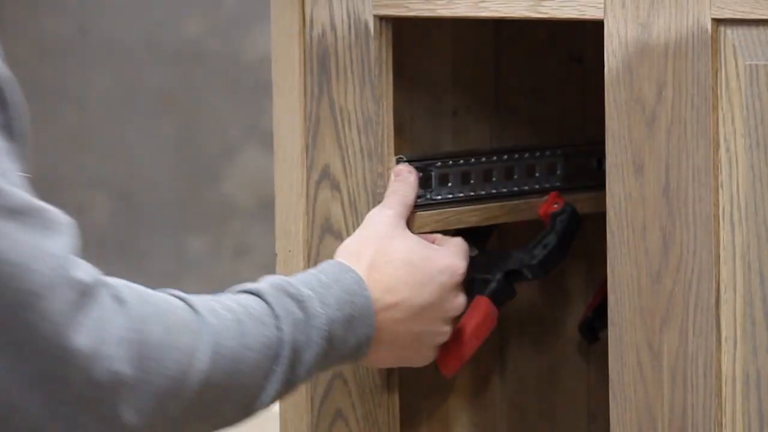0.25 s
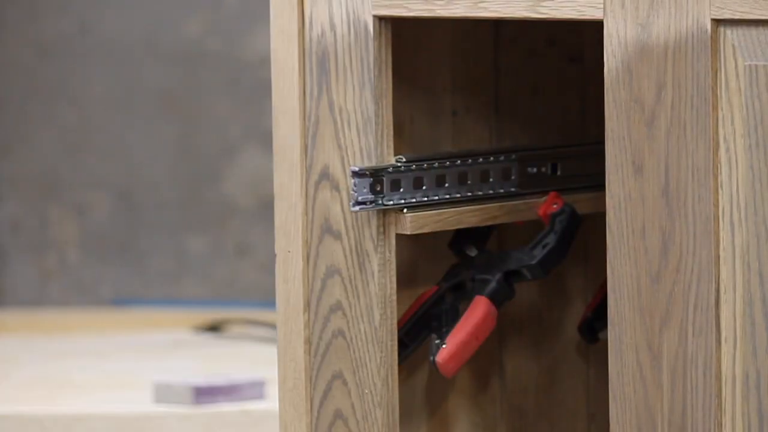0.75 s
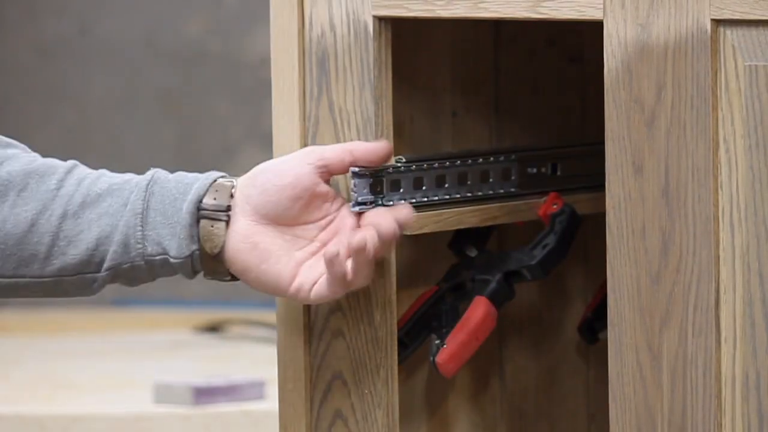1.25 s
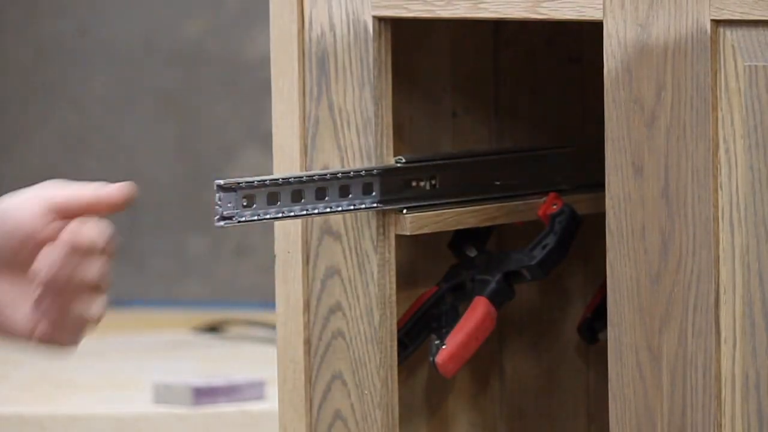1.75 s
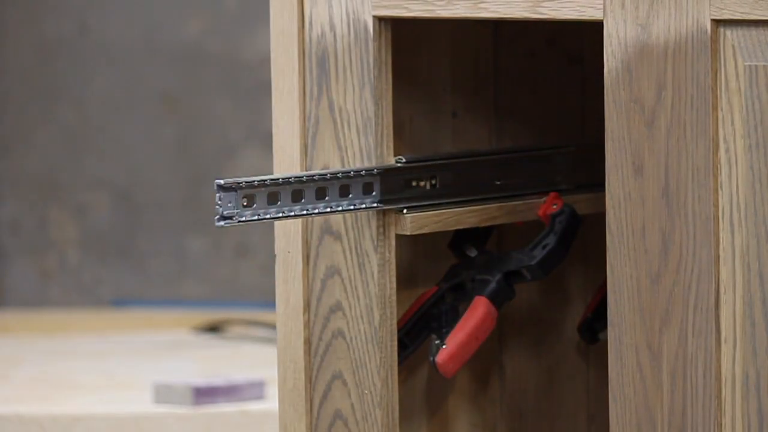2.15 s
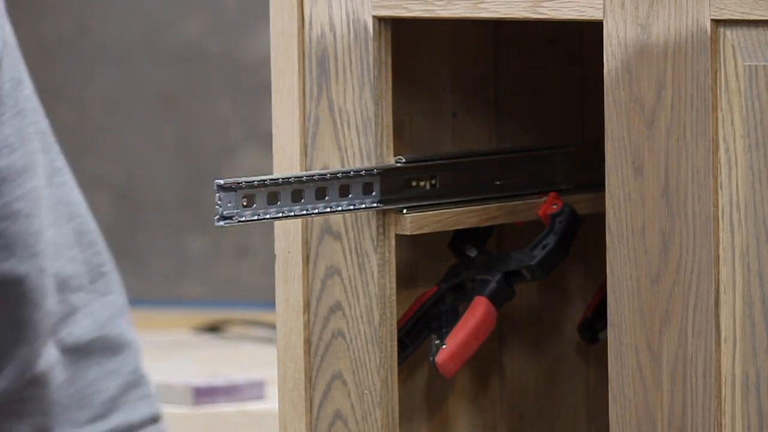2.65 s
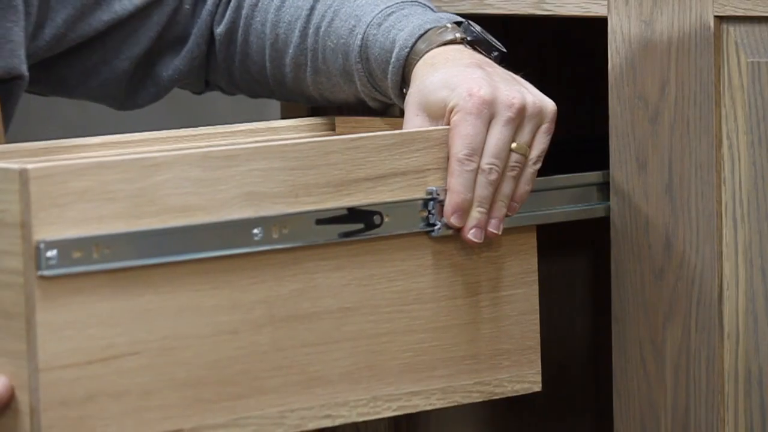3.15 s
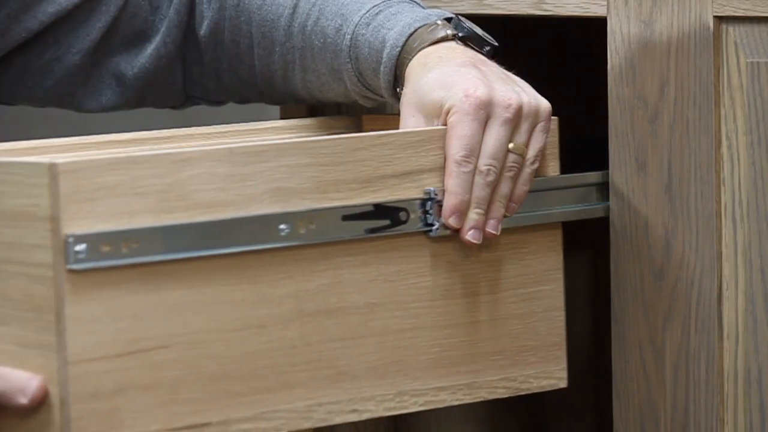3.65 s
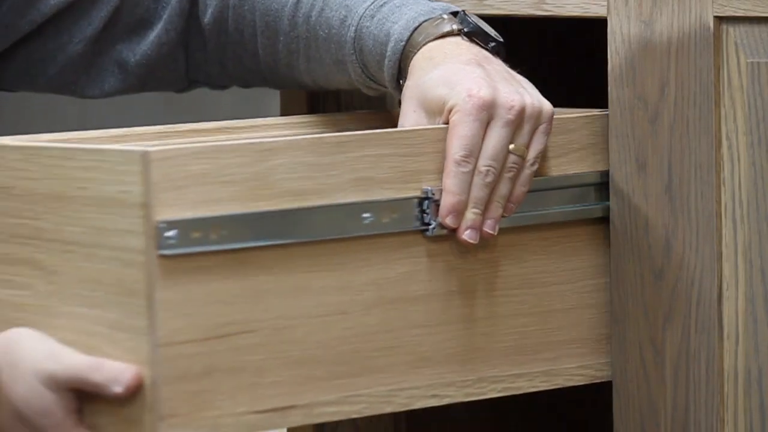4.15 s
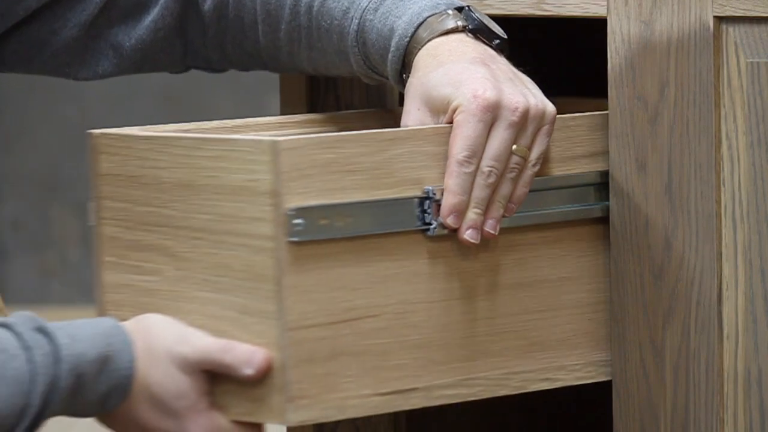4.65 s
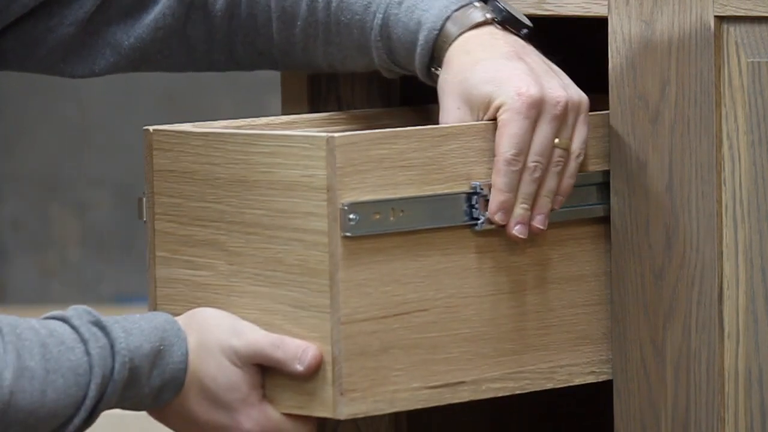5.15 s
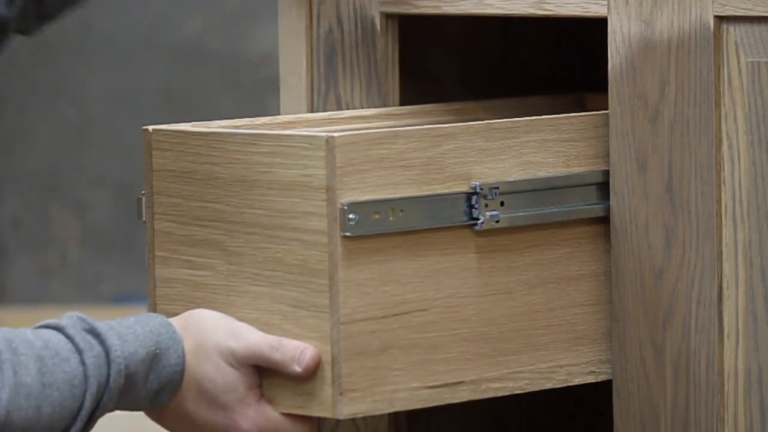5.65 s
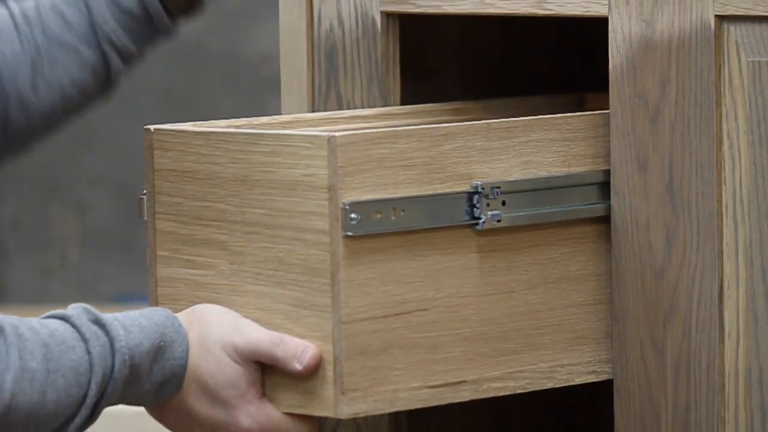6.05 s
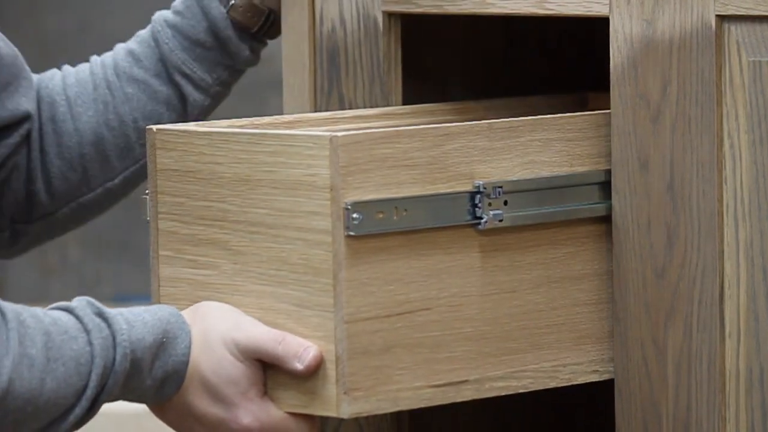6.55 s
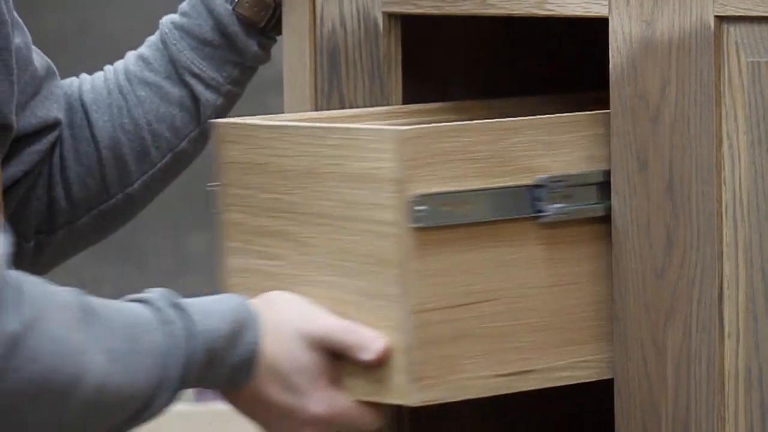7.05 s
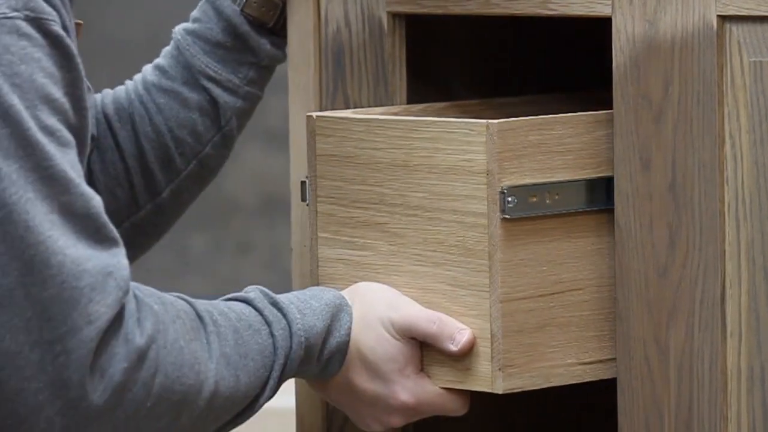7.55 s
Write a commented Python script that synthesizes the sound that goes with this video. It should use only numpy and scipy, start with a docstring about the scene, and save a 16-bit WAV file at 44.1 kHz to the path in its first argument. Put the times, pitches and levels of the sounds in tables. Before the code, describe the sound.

In a lively workshop, a steel runner is thumped home in a wooden cabinet, springs back with a click and short slide, then is pulled out to a loud clack. A wooden drawer rattles onto the rails, latches sharply, catches, jolts and breaks free with a hollow bang before rolling to a thud. Sleeves rustle over a steady fan whir. Close microphone, with room echo.

```python
"""A bare steel ball-bearing runner is pushed home and pulled out of an oak cabinet in a workshop.
A wooden drawer is then fed onto the runners: it knocks, latches, jolts and rolls in.
Knocks are short clatters plus ringing modes; rolling is made of countless tiny random contacts.
Sleeves (coloured grains) brush in between, over the steady whir of a fan (coloured noise) and a
thin whine (a sine). A decaying noise tail is the room; both channels carry the same sound."""
import sys
import numpy as np
from scipy import signal
from scipy.fft import rfft, irfft
from scipy.io import wavfile
from scipy.ndimage import uniform_filter1d

SR = 44100
rng = np.random.default_rng(int(sys.argv[2]) if len(sys.argv) > 2 else 0)


def wav_record(signal):
    """Record a signal, one row per channel, as 16-bit PCM in the file named by sys.argv[1]."""
    frames = np.transpose(np.atleast_2d(signal))
    bounded = np.clip(frames, -1, 1)
    # unit amplitude maps onto the largest positive 16-bit level
    quanta = np.round(bounded * 32767).astype(np.int16)
    wavfile.write(sys.argv[1], SR, quanta)


N = 343980
TIME = np.arange(N) / SR


def from_db(db):
    """Decibels to gain."""
    return np.exp(np.asarray(db) * np.log(10) / 20)


def rms_one(x):
    """Scale to rms 1."""
    return x / np.sqrt(np.mean(x ** 2) + 1e-20)


def unit_energy(x):
    """Scale to a sum of squares of 1."""
    return x / np.sqrt(np.sum(x ** 2) + 1e-20)


def at_hz(points, hz):
    """Read a table of (Hz, value) on a log-frequency axis."""
    freqs, values = np.transpose(points)
    return np.interp(np.log(hz + 1e-3), np.log(freqs), values)


def response(spectrum, size=4096):
    """Impulse response with this spectrum, its energy as early as possible (minimum phase); unit energy."""
    hz = np.arange(size // 2 + 1) * SR / size + 1
    octaves_outside = np.abs(np.log2(hz / np.clip(hz, spectrum[0][0], spectrum[-1][0])))
    # beyond the ends of the table the level falls 20 dB per octave
    level_db = at_hz(spectrum, hz) - 20 * octaves_outside
    cepstrum = irfft(np.log(from_db(level_db)))
    # folding the cepstrum onto positive times makes the response causal
    cepstrum[1:size // 2] *= 2
    cepstrum[size // 2 + 1:] = 0
    return unit_energy(irfft(np.exp(rfft(cepstrum))))


def colour(x, spectrum):
    """Give a white excitation this spectrum; it keeps its power."""
    return signal.oaconvolve(x, response(spectrum))[:len(x)]


def resonate(x, hz, width_hz):
    """Two-pole resonance: a wider one dies away faster."""
    r = np.exp(-np.pi * width_hz / SR)
    feedback = [1, -2 * r * np.cos(2 * np.pi * hz / SR), r * r]
    return signal.lfilter([1, 0, -1], feedback, x + 1e-18)


def dying(t, t60):
    """Falls 60 dB in t60 seconds."""
    return np.exp(-np.log(1000) * t / max(t60, 1e-3))


def add(track, s, sound):
    """Mix a sound in at time s."""
    start = round(s * SR)
    track[start:start + len(sound)] += sound[:N - start]


def grains(per_s, spread_db, size):
    """Random tiny contacts of uneven strength; rms 1."""
    unevenness = from_db(spread_db * np.minimum(rng.exponential(1, size), 4))
    strength = unevenness * rng.standard_normal(size)
    happens = rng.random(size) < per_s / SR
    return rms_one(strength * happens)


def swells(rows):
    """Gain that grows and fades in bells; each length is taken between the half-power points."""
    power = sum(from_db(db) ** 2 * .5 ** ((2 * (TIME - s) / length) ** 2) for s, length, db in rows)
    return np.sqrt(power)


# Colour of the fan's air noise. Each row: frequency in Hz, relative level in dB per Hz.
FAN = [(15, -11), (25, -7.5), (130, 3.5), (161, -1), (229, 3.5), (416, 3.5), (476, 1), (531, 1), (863, -21),
       (1480, 0.5), (2110, -15.5), (3430, -32), (3720, -16), (14800, -30), (16000, -38)]
# Resonances of the fan housing. Each row: frequency in Hz, width in Hz, level in dB.
FAN_PEAKS = [(358, 34, -67), (523, 33, -63), (708, 220, -62.5), (1245, 69, -62.5), (1660, 310, -69.5),
             (3410, 104, -66.5)]
AIR_DB = -57.5
WHINE_HZ, WHINE_DB = 15725, -72   # thin whine of some electronics


def background():
    """Fan air is coloured noise, its housing is resonating noise, and electronics whine as a faint sine."""
    air = from_db(AIR_DB) * colour(rng.standard_normal(N), FAN)
    housing = 0
    for hz, width_hz, db in FAN_PEAKS:
        housing = housing + from_db(db) * rms_one(resonate(rng.standard_normal(N), hz, width_hz))
    whine = from_db(WHINE_DB) * np.sqrt(2) * np.sin(2 * np.pi * WHINE_HZ * TIME)
    return air + housing + whine


# Arm movements brush the sleeves. Each row: middle in seconds, length in seconds, level in dB.
SLEEVE = [(.3, 0.39, -53), (.68, 0.21, -54), (1.2, 0.45, -52), (1.72, 0.22, -47), (2.23, 0.26, -49.5),
          (2.37, 0.19, -46.5), (2.72, 0.17, -52), (3.65, 0.84, -56), (4.58, 0.28, -55), (6.13, 0.23, -58),
          (6.5, 0.34, -63.5)]
# Colour of the cloth. Each row: frequency in Hz, relative level in dB per Hz.
CLOTH = [(300, -6.5), (900, 1), (1400, 5), (2300, 0.5), (3500, 1), (6500, -5), (12000, -6.5),
         (16000, -10.5)]
SLEEVE_REST_DB = -64   # rustle between the movements


def sleeves():
    """Fibres of a sweatshirt brush past each other in dense tiny contacts."""
    movement = np.hypot(swells(SLEEVE), from_db(SLEEVE_REST_DB))
    return movement * colour(grains(per_s=20000, spread_db=-2.0, size=N), CLOTH)


def clatter(t60, rise_s=0.0008):
    """Loose parts chatter for a moment after a blow; unit energy."""
    t = TIME[:SR // 4]
    chatter = grains(per_s=16000, spread_db=0.5, size=len(t))
    return unit_energy(chatter * dying(t, t60) * (1 - np.exp(-t / rise_s)))


def mode_tones(t, modes, rise_s=0.0056):
    """Each mode builds up and rings on, with alternating signs; modes x time."""
    tones = []
    for k, (hz, db, t60) in enumerate(modes):
        tones.append((-1) ** k * from_db(db) * np.sin(2 * np.pi * hz * t) * dying(t, t60))
    return np.array(tones) * (1 - np.exp(-t / rise_s))


def ringing(tones, weights_db=0, scatter_db=3.0):
    """The modes sound together, in a slightly different mix for each blow; unit energy."""
    mix_db = weights_db + scatter_db * rng.standard_normal(len(tones))
    return unit_energy(from_db(mix_db) @ tones)


def blow_gains(level_db, after_db):
    """Share a blow's energy, given as rms over 0.1 s, between its first clatter and its after-ring."""
    first = from_db(level_db) * np.sqrt(SR / 10 / (1 + from_db(after_db) ** 2))
    return first, first * from_db(after_db)


# Knocks of runner and drawer: the bare runner is pushed home (0.045 s), springs out (0.392) and
# hits its end stop (1.562). The drawer meets the runners (2.986), the latch snaps (4.084), the inner
# rails catch (5.1), the drawer jolts (5.904), breaks free (6.967) and comes to rest (7.488).
# Each row: start in seconds, basic 60 dB decay of the clatter in seconds, after-ring against clatter
# in dB, then levels in dB (rms over 0.1 s, before each part's trims) of cabinet, drawer and rail,
# hardness in dB (ball cage above rail), pitch of the struck spot in Hz, level of that spot in dB.
BLOWS = [ (0.045, 0.21, 6, -50, -47.5, -48, -1.5, 3050, -46.5),
         (0.062, 0.13, 1.5, -37, -41.5, -53, -10, 170, -39.5),
         (0.078, 0.2, 1.5, -43, -51, -46.5, -17, 1790, -41),
         (0.392, 0.038, 4, -74, -65, -45, 1.5, 4430, -45), (1.036, 0.13, -3, -68, -59, -47, -6, 3030, -51),
         (1.050, .05, -2, -58, -52.5, -48, -8, 2040, -46.5),
         (1.562, .04, 3.5, -40, -40.5, -49.5, 10, 4280, -44),
         (1.578, 0.16, 1, -35, -49, -46, -1, 156, -35.5),
         (1.600, 0.06, -2, -34.5, -59, -41, -3, 5320, -42.5),
         (2.714, 0.025, -12, -56, -55, -68.5, 15.5, 430, -51.5),
         (2.986, 0.055, 7, -51.5, -39.5, -36.5, -6, 953, -35.5),
         (3.017, 0.18, -4, -61, -40, -41.5, 5.5, 1210, -36.5),
         (3.024, 0.14, -2, -58, -55, -51, 5, 2340, -39),
         (3.047, 0.15, -2.5, -43.5, -40.5, -46, 1, 414, -35), (3.055, .05, 16, -52, -44.5, -62, 0, 85, -46),
         (4.036, 0.2, 0, -64, -48, -47.5, -15, 1120, -47),
         (4.058, .07, -11.5, -44.5, -54, -51, -1, 430, -47.5),
         (4.0839, 0.014, -5.5, -70, -54.5, -44, 10.5, 5660, -33.5),
         (4.093, 0.0067, -1, -77, -73, -48.5, 11, 5040, -45.5),
         (4.676, 0.037, 2.5, -44.5, -53, -49.5, -7, 1730, -47.5),
         (4.738, 0.21, -4.5, -43, -51, -45.5, -8, 3450, -39.5),
         (4.748, 0.12, 1, -58, -52, -48.5, -18, 2620, -39.5),
         (4.756, 0.085, 3, -42.5, -61, -60, -16, 189, -38.5),
         (5.056, 0.093, 9, -54, -46, -51, 2.5, 6900, -56),
         (5.100, 0.055, .5, -56, -36, -36, 1, 4380, -34.5),
         (5.103, 0.11, 16, -57, -42, -40.5, -15, 3240, -38),
         (5.106, 0.041, -2, -62, -46, -53, 2, 5260, -39.5),
         (5.904, 0.064, 0.5, -39.5, -40.5, -49, -16, 778, -39),
         (5.909, .09, 1, -41, -38, -44, -24, 1275, -34.5),
         (5.920, 0.21, 1, -39, -36.5, -48.5, -16, 91, -42.5),
         (6.492, 0.065, -0.5, -64, -52, -67, -13, 424, -58),
         (6.967, 0.13, -6.5, -62, -34, -34.5, -9, 2890, -39),
         (6.973, 0.049, 4, -40.5, -29, -35.5, -2, 840, -37.5),
         (7.488, 0.048, 5, -42, -42, -58, -9, 92, -39.5), (7.514, 0.17, 1, -43, -58, -77, 0, 138.5, -35)]
PANEL_DB = -2   # the thin panels shake this far from the mean level of drawer and rail


def part_levels():
    """What every blow gives to cabinet, drawer, panels, rail and ball cage, in dB; parts x blows."""
    cabinet, drawer, rail, hardness = np.transpose(BLOWS)[3:7]
    panels = (drawer + rail) / 2 + PANEL_DB
    return np.array([cabinet, drawer, panels, rail, rail + hardness])


def struck_part(levels_db, spectrum, modes, modes_db, room_db, slowness):
    """One part under all blows, its clatter stretched by slowness: (direct sound, sound sent to the room)."""
    t, body = TIME[:SR * 4 // 5], response(spectrum)
    near, far, tones = np.zeros((3, N))
    bank = mode_tones(t, modes)
    for (s, t60, after_db, *_), level_db in zip(BLOWS, levels_db):
        first, after = blow_gains(level_db, after_db)
        burst = unit_energy(signal.fftconvolve(clatter(t60 * slowness), body))
        add(near, s, first * burst)
        add(far, s, after * burst)
        add(tones, s, after * ringing(bank))
    return np.array([near + from_db(modes_db) * tones, from_db(room_db) * far])


def struck_spots(modes_db=-10.5, room_db=-0.5, width_share=0.085, falloff_db=55.0):
    """The spot that is hit adds its own resonance and wakes the modes near its pitch: (direct, room send)."""
    t = TIME[:SR * 4 // 5]
    modes = np.array(CABINET_MODES + DRAWER_MODES + PANEL_MODES + RAIL_MODES + CAGE_MODES)
    near, far = np.zeros((2, N))
    bank = mode_tones(t, modes)
    for s, t60, after_db, *_, hz, level_db in BLOWS:
        first, after = blow_gains(level_db, after_db)
        burst = unit_energy(resonate(clatter(t60), hz, width_share * hz))
        octaves_off = np.abs(np.log2(modes[:, 0] / hz))
        add(near, s, first * burst)
        add(near, s, after * from_db(modes_db) * ringing(bank, -falloff_db * octaves_off ** 2))
        add(far, s, after * from_db(room_db) * burst)
    return np.array([near, far])


# Strong modes of carcass, drawer box, thin panels, steel rail and ball cage.
# Each row: frequency in Hz, relative level in dB, 60 dB decay in seconds.
CABINET_MODES = [(63, -19, .9), (91, -15, .6), (112, -12, .5), (127, -4, .5), (140, -5, .5), (153, -4, .85),
                 (194, 0, .55), (205, -9, .6)]
DRAWER_MODES = [(243, -4, .5), (275, 0, .6), (294, -7, .6), (338, -8, .5), (384, -7, .5), (406, -2, .7),
                (448, -6, .5), (484, -7, .45), (535, -9, .45)]
PANEL_MODES = [(731, -6, .4), (868, 0, .4), (955, -6, .35), (1216, -1, .4), (1332, -5, .35),
               (1398, -3, .35), (1813, -4, .48)]
RAIL_MODES = [(2337, -3, .6), (2686, -3, .45), (2867, -4, .4), (3299, 0, .45), (3429, -2, .45),
              (4214, -2, .45), (4366, -2, .53), (5184, -6, .38), (5351, -3, .41)]
CAGE_MODES = [(8000, 13, .29), (8500, 11, 0.54), (9679, -11, .33), (9900, 5, .35), (11700, 3, .29)]
# The dense, quickly damped modes between them, as the colour of each part's clatter.
# Each row: frequency in Hz, relative level in dB per Hz.
CABINET = [(25, -42), (45, -19), (62, -2), (80, -10), (100, -9.5), (130, 0), (200, 10), (250, -16.5),
           (450, -36.5)]
DRAWER = [(100, -38.5), (190, -28), (260, 11.5), (420, 2.5), (540, -2.5), (800, -6), (1500, -71)]
PANEL = [(300, 7.5), (500, -11), (700, -8), (900, 2.5), (1250, 0), (1800, 1.5), (2300, -11.5), (4000, -10)]
RAIL = [(1200, -24), (2050, -7), (2340, 0), (2500, -5), (2800, 0), (3030, -4), (3350, 1), (3850, -9),
        (4300, -1), (4750, -10), (5350, -5), (6100, -14), (7000, -13), (10000, -34)]
CAGE = [(2500, 4), (5000, -5), (6500, -2), (8200, 0), (10800, -1.5), (12800, 1.5), (15000, -1.5),
        (16500, -18)]


def blows():
    """Every knock shakes carcass, drawer box, thin panels, steel rail and ball cage: (direct, room send)."""
    cabinet, drawer, panel, rail, cage = part_levels()
    return (struck_part(cabinet, CABINET, CABINET_MODES, modes_db=-1.0, room_db=1.5, slowness=1.5)
            + struck_part(drawer, DRAWER, DRAWER_MODES, modes_db=-4.5, room_db=0.5, slowness=1.08)
            + struck_part(panel, PANEL, PANEL_MODES, modes_db=-10.0, room_db=2.5, slowness=0.98)
            + struck_part(rail, RAIL, RAIL_MODES, modes_db=-20.5, room_db=-2.0, slowness=1.27)
            + struck_part(cage, CAGE, CAGE_MODES, modes_db=-22.0, room_db=-3.5, slowness=1.0)
            + struck_spots())


# How long the room rings. Each row: frequency in Hz, 60 dB decay in seconds.
ROOM_T60 = [(60, 0.48), (160, 1), (420, 0.84), (1100, 0.59), (2900, 0.6), (7700, 0.37), (15000, 0.14)]


def workshop(x, build_s=0.00073):
    """Diffuse echoes, a noise tail in 12 bands, build up quickly and die soonest in the top treble."""
    t, centres = TIME[:SR], np.geomspace(60, 15000, 12)
    noise, hz = rfft(rng.standard_normal(SR)), np.arange(SR // 2 + 1)
    tail = 0
    # each row of the identity matrix picks out one band, fading into its neighbours
    for centre, weights in zip(centres, np.eye(len(centres))):
        band = irfft(noise * at_hz(np.column_stack([centres, weights]), hz), SR)
        envelope = dying(t, at_hz(ROOM_T60, centre)) * (1 - np.exp(-t / build_s))
        tail = tail + band * unit_energy(envelope)
    transfer = rfft(tail)
    # a diffuse field is even over frequency, apart from its fine ripple
    even = transfer / np.sqrt(uniform_filter1d(np.abs(transfer) ** 2, size=50) + 1e-12)
    return signal.oaconvolve(x, irfft(even, SR)[:SR * 4 // 5])[:N]


RUN_ATTACK_S, RUN_RELEASE_S = .12, 0.046   # time for 60 dB of rise and of fall


def run_gain(start, end, swell_db):
    """A run sets in quickly, swells (or fades, if negative) evenly in dB, and stops; 1 at its end."""
    to_go = np.clip((end - TIME) / (end - start), 0, 1)
    attack = dying(np.clip(start - TIME, 0, 1), RUN_ATTACK_S)
    release = dying(np.clip(TIME - end, 0, 1), RUN_RELEASE_S)
    return attack * from_db(-swell_db * to_go) * release


# Runs along the slides. Each row: start in seconds, end in seconds, then levels at the end in dB,
# before the trims in rolling(), of drawer rumble, track grind and ball hiss,
# and the swell from start to end in dB.
RUNS = [ (0.416, 0.435, -38, -37.5, -38, 1), (0.471, 0.521, -46, -39.5, -43, -2.5),
        (0.998, 1.035, -50, -46, -44, 6), (1.402, 1.557, -41, -37.5, -44, 3),
        (2.82, 2.914, -64, -73, -63, -9.5), (2.944, 2.99, -58, -59, -47, 4.5),
        (3.683, 4.053, -50.5, -54, -55.5, 9), (4.507, 4.665, -44.5, -50, -62, 4),
        (6.905, 6.976, -37, -37.5, -44.5, 15.5), (7.153, 7.244, -44, -52, -63, -3.5),
        (7.28, 7.486, -41, -44.5, -50.5, 0.5), (7.724, 7.81, -39.5, -47.5, -56, 10.5)]
# Their colours. Each row: frequency in Hz, relative level in dB per Hz.
RUMBLE = [(40, -59), (70, -7.5), (110, -17), (190, -3), (260, -3), (420, -4), (560, -23.5), (1000, -43)]
GRIND = [(300, -13), (520, -3.5), (850, -2.5), (1300, -3), (2000, -5.5), (2700, -7.5), (5000, -18)]
BALLS = [(1300, -25), (2400, 0.5), (3200, 6.5), (3800, 2), (4400, 0.5), (6000, -0.5), (9500, -4),
         (13000, -1), (16000, -13)]


def rolling(wobble_db=2.0, rumble_db=-2.5, grind_db=-3.5, hiss_db=0.0):
    """Balls tick unevenly over the rough steel track, which shakes the wood it is screwed to."""
    rumble, grind, hiss = sum(np.outer(from_db(levels_db), run_gain(start, end, swell_db))
                              for start, end, *levels_db, swell_db in RUNS)
    bumps, scratches, ticks = (grains(per_s, 1.5, N) for per_s in (1500, 2500, 5000))
    # the load shifts from ball to ball
    shifting = rms_one(uniform_filter1d(rng.standard_normal(N), size=500))
    load = rms_one(from_db(wobble_db * shifting))
    return (from_db(rumble_db) * colour(rumble * bumps, RUMBLE)
            + from_db(grind_db) * colour(load * grind * scratches, GRIND)
            + from_db(hiss_db) * colour(load * hiss * ticks, BALLS))


# The drawer side judders as it is eased in. Each row: middle in seconds, length in seconds, level in dB.
JUDDER = [(3.42, 0.052, -45.5), (3.56, 0.13, -51), (3.98, 0.13, -54)]


def judder(hz=274, waver=0.019):
    """Wood sticks and slips on the rail at the drawer's main resonance: a sine of unsteady pitch."""
    unsteady = rms_one(uniform_filter1d(rng.standard_normal(N), size=1500))
    phase = 2 * np.pi * np.cumsum(hz * (1 + waver * unsteady)) / SR
    return swells(JUDDER) * np.sqrt(2) * np.sin(phase)


# Single balls snap along in their cage. Each row: start in seconds, level in dB, pitch in Hz.
BALL_SNAPS = [(4.518, -62, 11100), (4.53, -58, 2380), (4.854, -61, 3600), (4.951, -64, 11000),
              (6.139, -57.5, 9900), (6.629, -63, 3000), (6.708, -58.5, 1960), (6.831, -63, 3400)]
SNAP_T60_S = 0.099
SNAP_WIDTH_SHARE = 0.47   # width of the resonance as a share of its pitch
SNAP_ROOM_DB = -1.0   # room send against direct click


def ball_snaps():
    """A ball slips in its cage with a small click, too light to shake the wood: (direct, room send)."""
    out = np.zeros((2, N))
    for s, level_db, hz in BALL_SNAPS:
        click = unit_energy(resonate(clatter(SNAP_T60_S), hz, SNAP_WIDTH_SHARE * hz))
        for track, gain in zip(out, blow_gains(level_db, SNAP_ROOM_DB)):
            add(track, s, gain * click)
    return out


def scene():
    """All sources and the room, the same in both channels."""
    direct, send = blows() + ball_snaps()
    roll = rolling()
    room = workshop(send + from_db(1.0) * roll)
    mono = direct + roll + room + judder() + sleeves() + background()
    return np.array([mono, mono])


CUTOFF_HZ = 16200


def record(dry):
    """A steep low-pass filter removes the very top of the treble."""
    return signal.sosfilt(signal.ellip(12, .1, 80, CUTOFF_HZ, fs=SR, output="sos"), dry)


dry = scene()
out = record(dry)
wav_record(out)
```